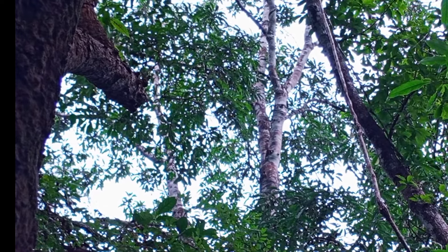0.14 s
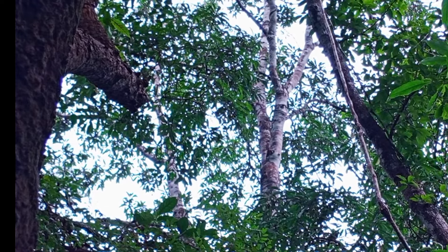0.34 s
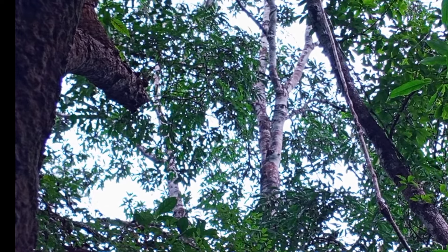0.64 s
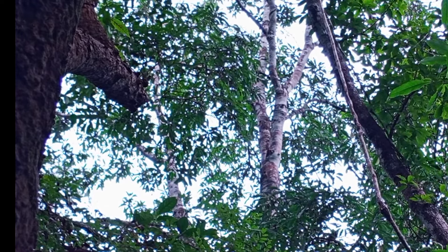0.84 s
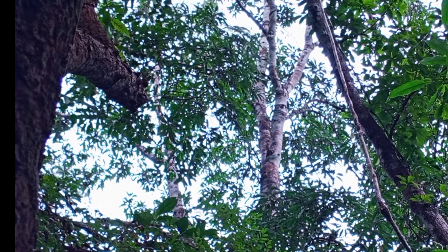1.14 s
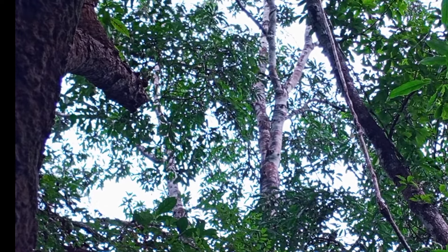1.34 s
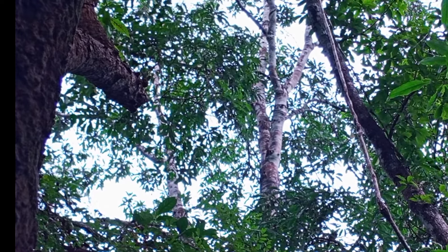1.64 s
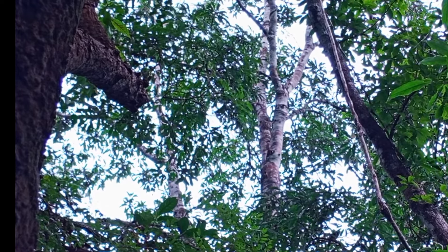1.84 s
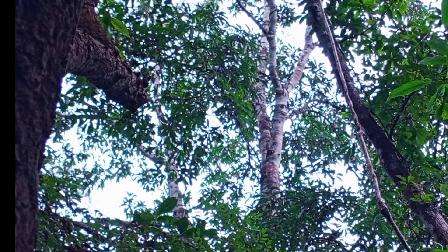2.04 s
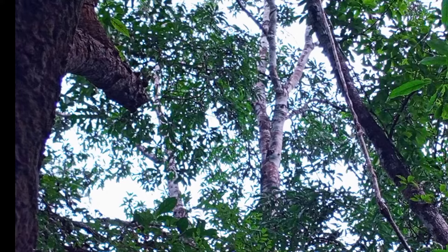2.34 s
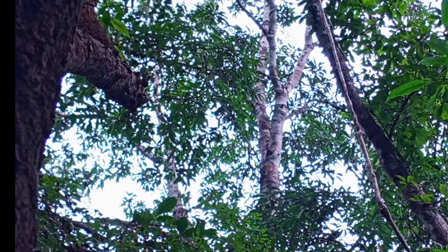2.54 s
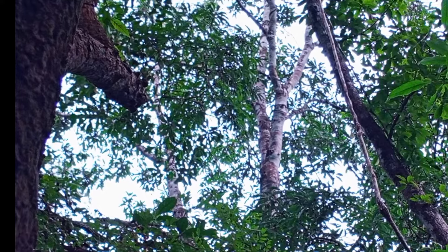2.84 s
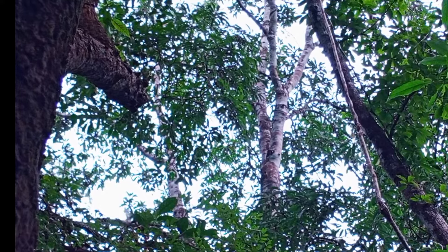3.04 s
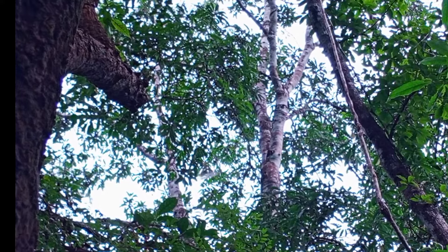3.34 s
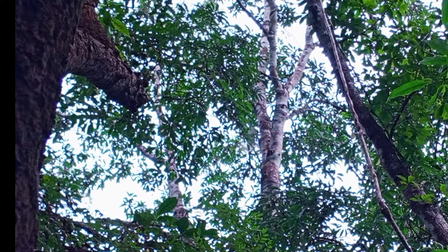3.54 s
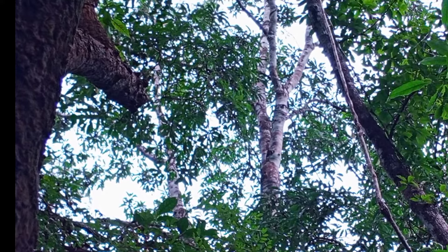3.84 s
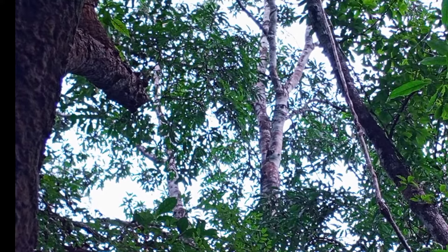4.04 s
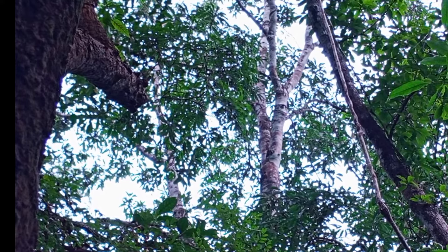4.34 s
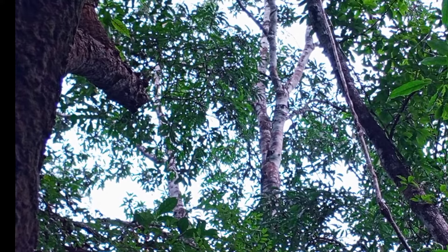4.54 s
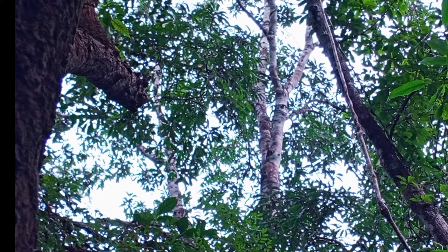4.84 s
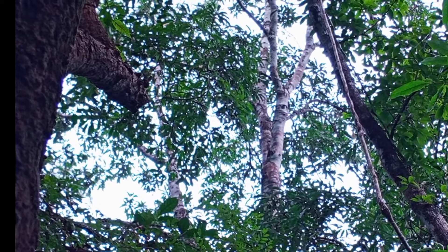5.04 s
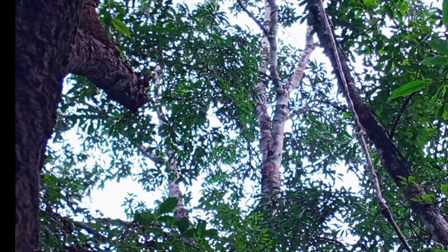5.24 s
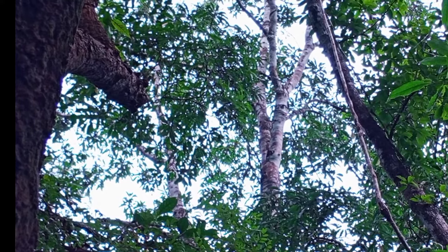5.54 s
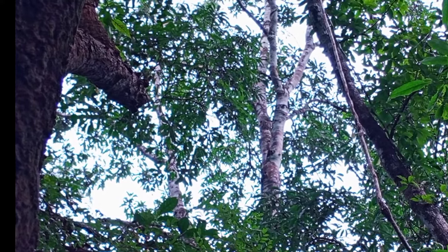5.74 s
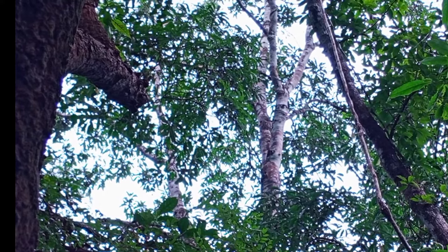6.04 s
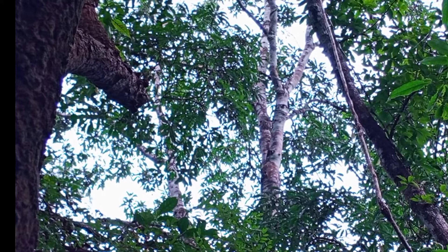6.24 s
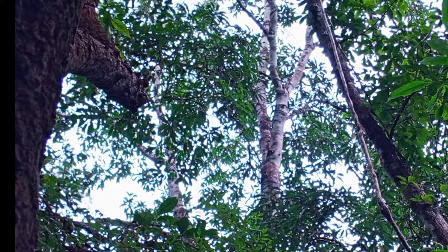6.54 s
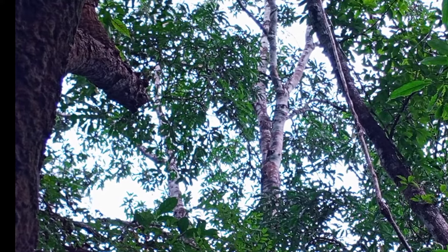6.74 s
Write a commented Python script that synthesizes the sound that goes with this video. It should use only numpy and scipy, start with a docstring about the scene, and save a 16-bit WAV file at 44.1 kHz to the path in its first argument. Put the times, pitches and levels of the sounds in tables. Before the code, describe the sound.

A near bird whistles loudly over a droning insect chorus in a forest, followed by chirp runs, dry ticks, a creak and a harsh squawk.

```python
"""A near bird whistles over a droning insect chorus under a forest canopy; hooked notes, screech and chatter join.
Bird calls are sines with overtones on drawn pitch curves; leaves and trunks scatter them as decaying noise echoes.
Crickets are pulsed tones, falling chirps come in runs, and the chorus and the air are shaped noise.
Dry ticks, a short creak and soft bumps are decaying rings with bursts of noise."""
import sys
import numpy as np
from scipy import signal
from scipy.io import wavfile
from scipy.ndimage import uniform_filter1d, map_coordinates

SR = 44100
rng = np.random.default_rng(int(sys.argv[2]) if len(sys.argv) > 2 else 0)


def put_to_file(sound):
    """Save the sound as 16-bit audio at rate SR, in the file named by the first command-line argument."""
    columns = np.atleast_2d(sound).T  # one column per channel
    safe = np.clip(columns, -1, 1)
    whole_steps = np.round(safe * 32767)
    wavfile.write(sys.argv[1], SR, whole_steps.astype(np.int16))


N = 304290
T = np.arange(N) / SR
EDGE_HZ = 15900

# Levels are nominal: swells, fades and scatter act on them later.
# near bird, rising whistles ending in a downward snap: (start [s], rise length [s], top pitch [Hz], level [dB])
RISING_WHISTLES = [(.065, .097, 2029, -33), (0.711, .094, 2000, -33)]
# near bird, arched whistles: (start [s], length [s], top pitch [Hz], level [dB])
ARCHED_WHISTLES = [(-.25, .272, 1608, -44.5), (0.343, .272, 1577, -39)]
# overtone colour of the near whistles and the hooked notes: (frequency [Hz], level [dB])
BIRD_OVERTONES = [(3200, -42), (4000, -29), (6200, -39), (7100, -19), (7850, -17), (9000, -27),
                  (10200, -36), (11100, -24), (11900, -33), (12650, -26), (14000, -38)]
# harsh call, pitch before swing and ceiling: (time [s], middle pitch [Hz], level [dB])
SCREECH = [(4.495, 2131, -43.5), (4.53, 2357, -39), (4.58, 2478, -37), (4.605, 2536, -35.5),
           (4.645, 2563, -37), (4.678, 2442, -45), (4.692, 2280, -54)]
# overtone colour of the harsh call: (frequency [Hz], level [dB])
RASP_OVERTONES = [(4000, -17), (6500, -35.5), (7600, -17.5), (8500, -14), (9800, -21.5), (11200, -15),
                  (12200, -24), (13000, -52), (15500, -42)]
# hooked notes, some at the ends of the near whistles, a glide then a flick: (start [s], glide length [s],
# first pitch [Hz], last pitch [Hz], nominal flick top [Hz], glide level [dB], flick level [dB])
HOOKS = [(.11, 0.054, 1850, 2000, 2880, -56, -56), (.412, .058, 2022, 2020, 2700, -44, -56.5),
         (.568, 0.044, 1892, 2018, 2650, -44, -60), (.8, 0.051, 1950, 2045, 2480, -41.5, -53.5),
         (1.669, 0.074, 1720, 2024, 2840, -48, -52), (1.854, .08, 1760, 2050, 3080, -46, -56),
         (2.498, 0.093, 1930, 2109, 2590, -49, -48), (4.415, 0.063, 1840, 2170, 3020, -45.5, -54)]
# sharp high chips: (start [s], top pitch [Hz], level [dB])
HIGH_CHIPS = [(2.959, 7680, -45.5), (5.587, 7470, -45)]
# thin high slurs: (start [s], length [s], first pitch [Hz], last pitch [Hz], level [dB])
HIGH_SLURS = [(4.292, 0.091, 6810, 5430, -55.5), (4.44, 0.056, 5470, 7100, -57),
              (6.864, 0.081, 6750, 5540, -59)]
# falling slurs of a far bird: (start [s], length [s], first pitch [Hz], last pitch [Hz], level [dB])
FAR_SLURS = [(0.264, 0.21, 3890, 2880, -61), (.47, .18, 3736, 2790, -55), (3.109, .19, 4200, 2926, -53),
             (5.16, 0.19, 4127, 2874, -52.5), (6.59, 0.17, 4090, 2885, -53)]
# soft far rattles: (start [s], length [s], base pitch [Hz], level [dB])
CHATTER = [(5.608, 0.161, 1947, -66), (6.043, .255, 1890, -63)]
# faint low whistles: (start [s], length [s], first pitch [Hz], last pitch [Hz], level [dB])
LOW_WHISTLES = [(3.655, 0.17, 1160, 1140, -70.5), (3.815, 0.09, 1138, 1170, -65.5),
                (6.65, 0.11, 1017, 1230, -62.5), (6.83, .1, 1214, 1130, -64.5)]
# shape of one insect chirp: (time from loudest point [s], pitch [Hz], level [dB])
CHIRP = [(-.018, 4560, -13), (-.011, 4250, -3), (-.002, 4020, 1), (.002, 3850, 2), (.008, 3480, -11)]
# runs of chirps: (first chirp [s], chirps [count], first gap [s], lengthening per gap [s], level [dB])
CHIRP_RUNS = [(1.528, 7, .0703, .0002, -42.7), (3.718, 8, .069, .0007, -42.9),
              (5.9257, 8, .0665, .0015, -44.2)]
# bouts of the near cricket: (first pulse [s], last pulse [s], pulse rate [1/s])
BOUTS = [(.353, 1.514, 26.7), (3.575, 4.807, 26.8), (6.605, 6.907, 26.5)]
# steady crickets farther off: (pitch [Hz], pulse rate [1/s], level [dB])
FAR_SINGERS = [(5077, 33, -67), (5156, 18, -67.5), (5490, 5.2, -79), (8700, 30, -86.5), (6750, 12, -110)]
# chorus loudness before a fixed offset: (time [s], level [dB])
CHORUS_LEVEL = [(0.0, -57.5), (0.23, -57), (0.67, -51), (1.4, -60), (1.88, -58.5), (2.08, -56.5),
                (3.59, -56.5), (3.86, -61), (4.65, -55.5), (4.84, -61.5), (5.21, -55), (5.44, -60.5),
                (5.77, -58), (6.11, -55), (6.55, -53.5), (6.9, -55)]
# chorus spectrum: (frequency [Hz], relative level [dB])
CHORUS_SPECTRUM = [(3000, -24), (3450, -8), (3700, 2.5), (4000, 5.5), (4300, 5.5), (4550, 3.5), (4800, -4),
                   (5200, -2), (5600, -34)]
# dry ticks: (time [s], peak level [dB], ring [Hz])
TICKS = [(1.7752, -32, 10500), (1.9751, -29.5, 10000), (2.0407, -31, 10700), (2.613, -37.5, 9900),
         (3.785, -45.5, 11300), (4.1314, -19, 9600), (4.19, -26, 10800), (4.215, -33, 9100),
         (4.474, -41.5, 10300), (5.394, -46, 2600), (5.48, -37, 9900), (5.957, -45, 2000),
         (6.359, -45, 1950)]
# body modes that every tick rings: (frequency [Hz], level [dB], t60 [s])
TICK_MODES = [(2110, -30.5, 0.031), (4900, -37.5, 0.017), (8000, -12, .003), (12500, -56, 0.0026)]
# creak: (time [s], slip rate [1/s], peak level [dB])
CREAK = [(4.134, 190, -15.5), (4.145, 220, -30), (4.156, 320, -50), (4.167, 330, -31), (4.183, 190, -48),
         (4.188, 380, -43)]
# soft bumps: (time [s], level [dB], ring [Hz], t60 [s])
BUMPS = [(1.52, -56.5, 345, 0.084), (2.057, -62, 550, 0.052), (2.595, -65.5, 520, 0.15),
         (2.799, -58, 346, 0.082), (3.086, -53.5, 340, 0.04), (3.635, -51.5, 357, 0.043),
         (4.139, -52, 243, 0.32), (4.944, -54, 147.6, 0.047), (5.005, -53.5, 146, 0.074),
         (5.392, -53, 159, 0.059), (6.041, -54.5, 363, 0.064)]
# forest air spectrum: (frequency [Hz], relative density [dB per Hz])
AIR_SPECTRUM = [(25, -38), (50, -7), (80, 2), (150, 2), (300, -0.5), (700, -5), (1500, -8.5), (2800, -7),
                (5800, -13), (10500, -19.5), (12000, -17.5), (14000, -46), (16000, -36)]


def near_bird(jitter=0.0036, wet_db=-9, treble_wet_db=-1, t60_s=1.0, treble_t60_s=0.85):
    """Leaves scatter the short waves of the overtones far more than the whistle itself."""
    notes = [rising_whistle(*row) for row in RISING_WHISTLES]
    notes += [arched_whistle(*row) for row in ARCHED_WHISTLES]
    voice = whistles(notes, jitter, BIRD_OVERTONES, bright_db=0.5)
    low = signal.sosfiltfilt(signal.butter(4, 3500, fs=SR, output="sos"), voice)
    treble = voice - low
    return forest(low, wet_db, t60_s, early_db=6.5) + forest(treble, treble_wet_db, treble_t60_s, early_db=8)


def rising_whistle(start_s, length_s, top_hz, level_db, rise=.21, bend=1.5, attack_s=0.032,
                   snap_s=0.012, snap_to_hz=660, snap_time_s=.0062, snap_db=-23):
    """The pitch climbs and levels off, then snaps down as the voice lets go."""
    t = np.arange(0, length_s + snap_s, 1 / SR)
    climb_hz = top_hz * (1 - rise * np.maximum(1 - t / length_s, 0) ** bend)
    snap = 1 - np.exp(-np.maximum(t - length_s, 0) / snap_time_s)
    hz = climb_hz + (snap_to_hz - climb_hz) * snap
    return start_s + t, hz, gain_of(level_db + snap_db * snap) * envelope(t, attack_s, 0.0037)


def arched_whistle(start_s, length_s, top_hz, level_db, arch=.155, skew=.88, roundness=.85,
                   attack_s=0.058, release_s=0.013):
    """The pitch rises and falls in one smooth arch."""
    t = np.arange(0, length_s, 1 / SR)
    height = abs(np.sin(np.pi * (t / length_s) ** skew)) ** roundness
    hz = top_hz * (1 - arch * (1 - height))
    return start_s + t, hz, gain_of(level_db) * envelope(t, attack_s, release_s, depth_db=10)


def screech(flutter_per_s=28.5, sweep=.3, chaos=0.1002, chaos_per_s=900, dip_db=3, ceiling_hz=2950,
            rough_db=3.5, bright_db=3):
    """The pitch plunges again and again from its ceiling while the voice breaks into chaos."""
    t, hz, level = contour(SCREECH)
    fall = 1 - 2 * (((t - t[0]) * flutter_per_s + .5) % 1)
    hz = hz * np.exp(sweep * fall + chaos * wander(t, chaos_per_s))
    hz = hz / (1 + (hz / ceiling_hz) ** 12) ** (1 / 12)  # soft ceiling
    wave = tone(hz, RASP_OVERTONES, count=5, push=gain_of(bright_db))
    rough = gain_of(dip_db * fall + rough_db * wander(t, 263.5))
    out = np.zeros(N)
    add(out, t[0], level * rough * wave)
    return out


def hooked_notes():
    """Hooked notes, some at the ends of the near whistles, their pitch unsteady, with strong scatter."""
    notes = [hook(*row) for row in HOOKS]
    voice = whistles(notes, jitter=0.017, overtones=BIRD_OVERTONES, bright_db=-1)
    return forest(voice, wet_db=-2.0, t60_s=0.89)


def hook(start_s, length_s, first_hz, last_hz, flick_hz, glide_db, flick_db, flick_s=0.0355, bend=1.273,
         louder_db_per_octave=80):
    """A shallow glide whose level follows its pitch, then a quick, hoarse flick up and back."""
    t = np.arange(0, length_s + flick_s, 1 / SR)
    glide = last_hz + (first_hz - last_hz) * np.maximum(1 - t / length_s, 0) ** bend
    flick = np.sin(np.pi * np.maximum(t - length_s, 0) / flick_s)
    hoarse = .85 + .28 * np.tanh(wander(t, 700))
    level_db = glide_db + louder_db_per_octave * np.log2(glide / last_hz)
    level_db = level_db + (flick_db - glide_db) * np.maximum.accumulate(flick)
    hz = glide + (flick_hz - last_hz) * flick * hoarse
    return start_s + t, hz, gain_of(level_db) * envelope(t, 0.004, 0.0045)


def high_calls():
    """Pure tones: sharp chips and thin slurs, with more scatter than direct sound."""
    notes = [chip(*row) for row in HIGH_CHIPS]
    notes += [slur(*row, bend=.8, fade_db=-4, edge_s=.008) for row in HIGH_SLURS]
    return forest(whistles(notes, jitter=0.016), wet_db=0.5, t60_s=0.61)


def chip(start_s, top_hz, level_db, rise_s=.026, fall_s=.056, drop=0.33, fall_bend=1.8,
         louder_db_per_octave=33):
    """The pitch shoots up and falls back more slowly; the top is loudest."""
    t = np.arange(0, rise_s + fall_s, 1 / SR)
    below = np.maximum(1 - t / rise_s, 0) + np.maximum((t - rise_s) / fall_s, 0) ** fall_bend
    hz = top_hz * (1 - drop * below)
    level = gain_of(level_db + louder_db_per_octave * np.log2(hz / top_hz))
    return start_s + t, hz, level * envelope(t, 0.0026, 0.0046)


def slur(start_s, length_s, first_hz, last_hz, level_db, bend, fade_db, edge_s):
    """One glide between two pitches that fades as it goes; a bend above 1 levels off toward the end."""
    t = np.arange(0, length_s, 1 / SR)
    hz = last_hz + (first_hz - last_hz) * np.maximum(1 - t / length_s, 0) ** bend
    level = gain_of(level_db + fade_db * t / length_s)
    return start_s + t, hz, level * envelope(t, edge_s, edge_s, depth_db=5)


def far_slurs():
    """Pure falling slurs that arrive mostly as scatter."""
    notes = [slur(*row, bend=1.3, fade_db=-7, edge_s=0.026) for row in FAR_SLURS]
    return forest(whistles(notes, jitter=0.0276), wet_db=5, t60_s=1.0)


def chatter(arches_per_s=31, chaos=0.0745, sag=0.0477, attack_s=0.024, release_s=0.088):
    """A distant bird rattles off tiny arched notes, sinking a little."""
    out = np.zeros(N)
    for start_s, length_s, base_hz, level_db in CHATTER:
        t = np.arange(0, length_s, 1 / SR)
        arch = abs(np.sin(np.pi * arches_per_s * t))
        swing = .5 * (arch - .7)
        level = gain_of(level_db) * envelope(t, attack_s, release_s, depth_db=8)
        hz = base_hz * (1 + swing - sag * t / length_s + chaos * wander(t, 700))
        add(out, start_s, level * evened(np.sqrt(arch)) * tone(hz))
    return out


def low_whistles():
    """Faint pure whistles with soft edges."""
    notes = [slur(*row, bend=1.41, fade_db=-1.5, edge_s=0.035) for row in LOW_WHISTLES]
    return forest(whistles(notes, jitter=0.0033), wet_db=-4, t60_s=0.34)


def birds():
    """Each kind of call with its own share of forest scatter."""
    calls = near_bird() + hooked_notes()
    calls += forest(screech(), wet_db=-5.0, t60_s=0.82, early_db=7.5)
    calls += high_calls() + far_slurs()
    calls += forest(chatter(), wet_db=-6.5, t60_s=0.25)
    return calls + low_whistles()


def chirps(soft_start_db=-7.0, swell_s=0.15, second_db=-36, third_db=-31, jitter=0.022):
    """The same falling chirp, some fourteen times a second, in runs that swell and slow down slightly."""
    out = np.zeros(N)
    t, hz, level = contour(CHIRP)
    overtones = [(8000, second_db), (12000, third_db)]
    for first_s, count, gap_s, lengthening_s, run_db in CHIRP_RUNS:
        for k in range(count):
            since_s = k * gap_s + lengthening_s * k * (k - 1) / 2
            level_db = run_db + soft_start_db * max(1 - since_s / swell_s, 0)
            wave = tone(hz * (1 + jitter * wander(t, 375)), overtones, count=3)
            add(out, first_s + since_s + t[0], gain_of(level_db) * level * wave)
    return out


def near_cricket(pitch_hz=4645, level_db=-51, flicker_db=1.0, attack_s=0.18):
    """One cricket pulses in bouts, each with a soft start."""
    out = np.zeros(N)
    for first_s, last_s, per_s in BOUTS:
        t = np.arange(first_s - .5 / per_s, last_s + .5 / per_s, 1 / SR)
        level = gain_of(level_db + flicker_db * wander(t, 14.5)) * envelope(t, attack_s, 0.024, depth_db=2)
        strokes = (t - first_s) * per_s
        add(out, t[0], level * wing_strokes(strokes, pitch_hz, sag=0.011, duty=.68, overtone_db=-32))
    return out


def wing_strokes(strokes, pitch_hz, sag, duty, overtone_db):
    """Each closing of the wings rings one pulse, whose pitch sags as the scraper slows; no two quite alike."""
    place = ((strokes + .5) % 1 - .5) / duty  # -0.5 to 0.5 across a pulse; beyond that lies the gap between pulses
    swell = np.sqrt(np.maximum(np.cos(np.pi * np.clip(place, -.5, .5)), 0))
    hz = pitch_hz * (1 - sag * place * (1 + 2 * place) + .004 * wander(strokes, 3))
    return swell * tone(hz, [(9000, overtone_db), (14000, overtone_db - 3)], count=2)


def far_crickets(swell_db=2.8, flicker_db=2.2):
    """Other crickets pulse without a pause, each at its own pitch and pace, fading in and out."""
    song = np.zeros(N)
    for hz, per_s, singer_db in FAR_SINGERS:
        strokes = per_s * T + .2 * wander(T, 4)
        pulses = wing_strokes(strokes, hz, sag=.016, duty=.62, overtone_db=-21.5)
        level_db = singer_db + swell_db * wander(T, 2.735) + flicker_db * wander(T, per_s)
        song += gain_of(level_db) * evened(pulses)
    return forest(song, wet_db=-8, t60_s=.5)


def chorus(offset_db=0.5, throb_db=1.74, throb_per_s=12.0):
    """Countless distant insects merge into a noise band that throbs lightly."""
    throb = np.sin(2 * np.pi * (throb_per_s * T + 0.82 * wander(T, 2.14)))
    level_db = np.interp(T, *np.transpose(CHORUS_LEVEL)) + offset_db + throb_db * throb
    return gain_of(level_db) * hiss(CHORUS_SPECTRUM, patchy_db=-0.5, size=(2, 9))


def insects(chirp_wet_db=-8.0, cricket_wet_db=-12):
    """The nearer singers stay distinct above the chorus."""
    chirping = forest(chirps(), chirp_wet_db, t60_s=.45, early_db=0)
    pulsing = forest(near_cricket(), cricket_wet_db, t60_s=.35)
    return chirping + pulsing + far_crickets() + chorus()


def tick(ring_hz, ring_t60_s=.004, crack_db=-5, crack_t60_s=.003, rustle_db=-33, rustle_t60_s=.05,
         top_hz=12500):
    """A tiny noise crack and the brief ring of a small hard body, peak 1."""
    t = np.arange(2048) / SR
    modes = TICK_MODES + [(ring_hz, -2, ring_t60_s)]
    ring = sum(gain_of(db - 60 * t / t60_s) * np.sin(2 * np.pi * hz * t) for hz, db, t60_s in modes)
    decay = gain_of(crack_db - 60 * t / crack_t60_s) + gain_of(rustle_db - 60 * t / rustle_t60_s)
    wave = ring + rng.standard_normal(len(t)) * decay
    wave = signal.lfilter(*signal.butter(3, top_hz, fs=SR), wave)
    return wave / abs(wave).max()


def ticks_and_creak(creak_hz=10300, wet_db=-12):
    """Single ticks, and a creak of slips at an uneven rate, each ringing a little differently."""
    out = np.zeros(N)
    for time_s, peak_db, ring_hz in TICKS:
        add(out, time_s, gain_of(peak_db) * tick(ring_hz))
    t, slips_per_s, level = contour(CREAK)
    slip_count = np.floor(np.cumsum(slips_per_s) / SR)
    for i in np.flatnonzero(np.diff(slip_count)):
        slip = tick(creak_hz * rng.uniform(.8, 1.12), ring_t60_s=.002, crack_t60_s=.002)
        add(out, t[i], level[i] * slip)
    return forest(out, wet_db, t60_s=.2, early_db=-3, early_t60_s=.1)


def faint_ticks(count=28, peak_db=-53, spread_db=4, ring_hz=10500):
    """Tiny ticks at chance moments, of varied size and ring."""
    out = np.zeros(N)
    for when, size, colour in rng.uniform(-1, 1, (count, 3)):
        wave = tick(ring_hz * (1 + 0.18 * colour))
        add(out, (when + 1) / 2 * N / SR, gain_of(peak_db + spread_db * size) * wave)
    return forest(out, wet_db=1, t60_s=.2)


def bumps(scuff_db=-1, scuff_hz=1300, scuff_speed=1.0, tap_db=9, tap_t60_s=0.003):
    """Soft contacts near the microphone: a dull tap, a brief scuff and a low dying ring."""
    out, t = np.zeros(N), np.arange(16384) / SR
    for time_s, level_db, ring_hz, t60_s in BUMPS:
        ring = np.sin(2 * np.pi * ring_hz * t) * gain_of(-60 * t / t60_s)
        noise = rng.standard_normal(len(t))
        dull = evened(signal.lfilter(*signal.butter(1, [150, scuff_hz], "band", fs=SR), noise))
        dull = signal.lfilter(*signal.butter(2, 3000, fs=SR), dull)
        tap = gain_of(tap_db - 60 * t / tap_t60_s)
        scuff = gain_of(scuff_db - 60 * t * scuff_speed / t60_s)
        onset = np.minimum(t / 0.0011, 1)
        add(out, time_s, gain_of(level_db) * onset * (ring + (tap + scuff) * dull))
    return out


def forest_air():
    """The soft hush of the forest: shaped noise with a slowly patchy level."""
    return gain_of(-64.5) * hiss(AIR_SPECTRUM, patchy_db=0.98, size=(8, 16))


def forest(x, wet_db, t60_s, early_db=-3, early_t60_s=0.3):
    """Near leaves and far trunks each scatter a sound into a tail of sparse echoes; echo energy sums to 1."""
    t = np.arange(SR) / SR
    near, far = rng.standard_normal((2, SR)) * (rng.random((2, SR)) < .08) * (t > .004)
    near = near * gain_of(-60 * t / early_t60_s)
    far = far * gain_of(-60 * t / t60_s) * np.minimum(t / 0.014, 1)
    echoes = gain_of(early_db) * near / np.linalg.norm(near) + far / np.linalg.norm(far)
    echoes = gain_of(wet_db) * echoes
    echoes[0] = 1  # direct sound
    return signal.fftconvolve(x, echoes / np.linalg.norm(echoes))[:N]


def whistles(notes, jitter, overtones=None, bright_db=0, pure_below=0.23, purer_db_per_octave=20):
    """A bird's notes: the pitch trembles a little; overtones are richest when the note is loud and low."""
    out = np.zeros(N)
    for t, hz, level in notes:
        octaves = np.log2(np.maximum(hz / 1600, 1))
        loud = np.tanh((level / level.max() / pure_below) ** 2)
        push = gain_of(bright_db - purer_db_per_octave * octaves) * loud
        add(out, t[0], level * tone(hz * (1 + jitter * wander(t, 900)), overtones, push=push))
    return out


def tone(hz, overtones=None, count=8, push=1):
    """A sine on a pitch curve, with overtones coloured by a spectrum and scaled by push."""
    phase = 2 * np.pi * np.cumsum(hz) / SR
    wave = np.sin(phase)
    if overtones is not None:
        for k in range(2, count + 1):
            audible = k * hz < EDGE_HZ
            wave += push * gain_of(read(overtones, k * hz)) * audible * np.sin(k * phase)
    return np.sqrt(2) * wave


def contour(rows):
    """Times, pitch (or rate) and soft-edged amplitude along a table."""
    s, hz, db = np.transpose(rows)
    t = np.arange(s.min(), s.max(), 1 / SR)
    edges = np.clip(np.minimum(t - t[0], t[-1] - t) / .002, 0, 1)
    return t, np.interp(t, s, hz), gain_of(np.interp(t, s, db)) * edges


def envelope(t, attack_s, release_s, depth_db=20):
    """Attack, hold and release over the times t, straight in dB, with soft edges."""
    since, left = t - t[0], t[-1] - t
    ramps = np.maximum(1 - since / attack_s, 0) + np.maximum(1 - left / release_s, 0)
    edges = np.clip(np.minimum(since, left) / .002, 0, 1)
    return gain_of(-depth_db * ramps) * edges


def hiss(spectrum, patchy_db, size):
    """Noise of a given spectrum, rms 1, whose level drifts in patches of size (frames, bins)."""
    hz = np.fft.rfftfreq(2048, 1 / SR)
    real, imag, patches = rng.standard_normal((3, N // 512 + 5, len(hz)))
    patches = evened(uniform_filter1d(uniform_filter1d(patches, size[0], 0), size[1], 1))
    frames = (real + 1j * imag) * gain_of(read(spectrum, hz) + patchy_db * patches)
    return evened(signal.istft(frames.T, nperseg=2048, noverlap=1536)[1][:N])


def wander(t, per_s):
    """Smooth chance of rms about 1 at the times t."""
    knots = rng.standard_normal(2048)
    return map_coordinates(knots, [(t - t[0]) * per_s], order=3, mode="wrap")


def read(points, hz):
    """Reads a spectrum on a log-frequency axis."""
    f, value = np.transpose(points)
    return np.interp(np.log(hz + 1), np.log(f + 1), value)


def gain_of(db):
    """Decibels to amplitude."""
    return 10 ** (np.asarray(db) / 20)


def evened(x):
    """Scales to rms 1."""
    return x / np.sqrt(np.mean(x ** 2) + 1e-20)


def add(mix, start_s, sound):
    """Mixes a sound in at start_s, cutting what falls outside."""
    start = round(start_s * SR)
    sound = sound[max(-start, 0):]
    part = mix[max(start, 0):][:len(sound)]
    part += sound[:len(part)]


def scene():
    """Birds, insects and small contacts over the soft hush of the forest."""
    living = birds() + insects()
    contacts = ticks_and_creak() + faint_ticks() + bumps()
    return (living + contacts + forest_air())[None]


def record(dry):
    """Bass roll-off at 45 Hz and a steep band limit at EDGE_HZ."""
    lean = signal.lfilter(*signal.butter(2, 45, "high", fs=SR), dry)
    band_limit = signal.firwin(511, EDGE_HZ, window=("kaiser", 9), fs=SR)
    return signal.oaconvolve(lean, band_limit[None], "same")


dry = scene()
out = record(dry)
put_to_file(out)
```